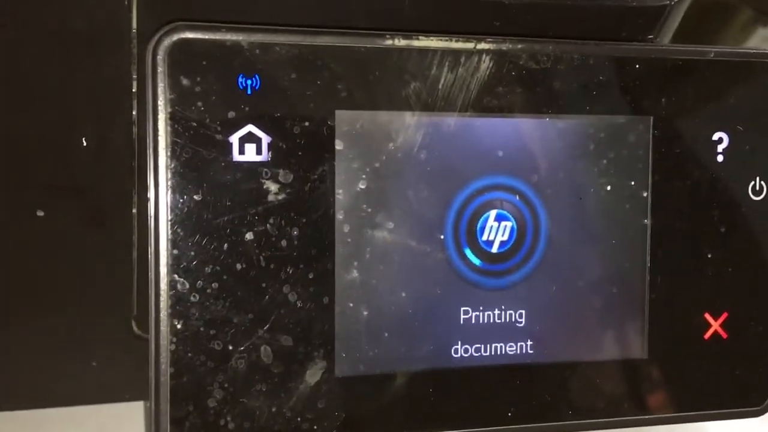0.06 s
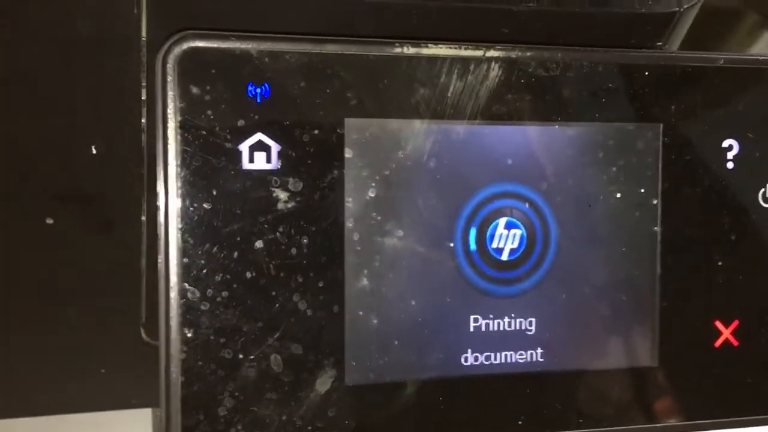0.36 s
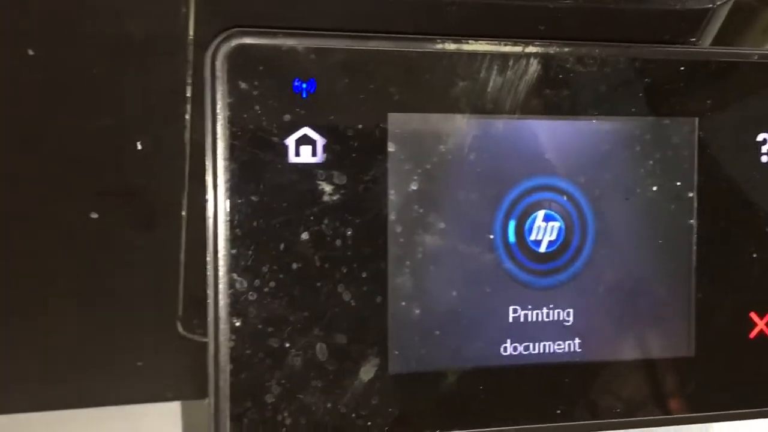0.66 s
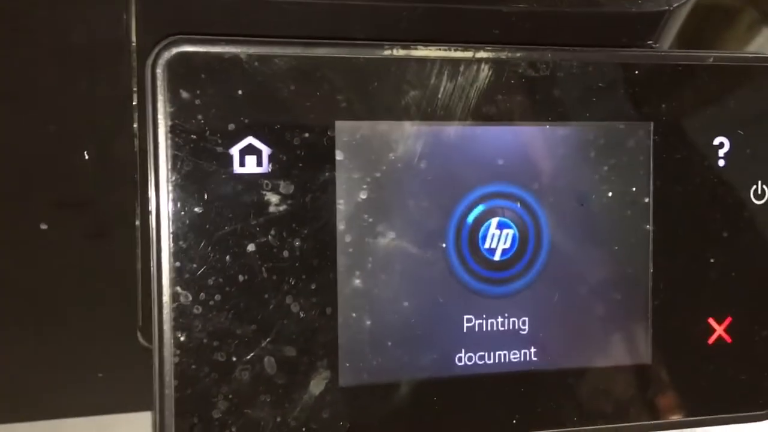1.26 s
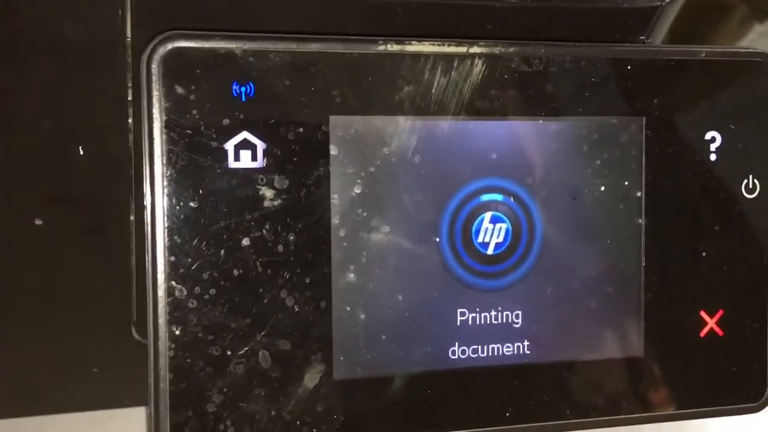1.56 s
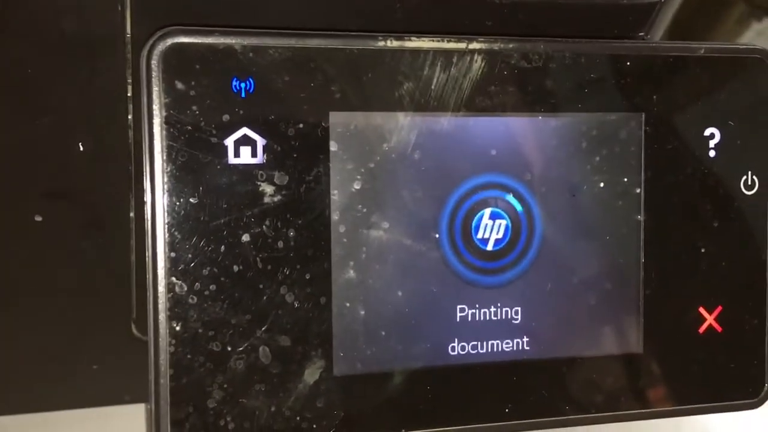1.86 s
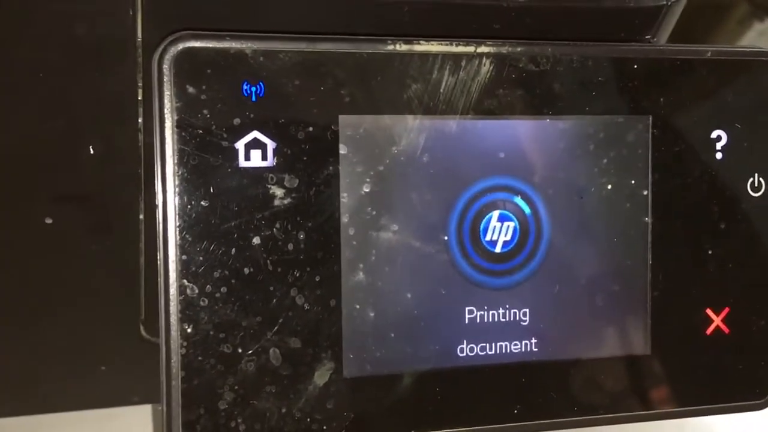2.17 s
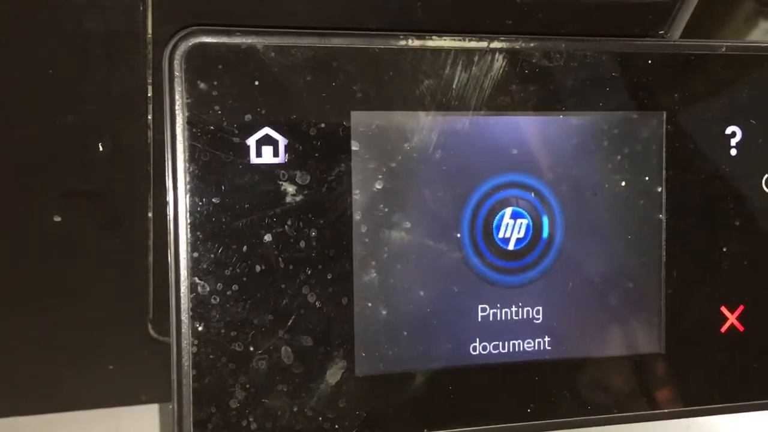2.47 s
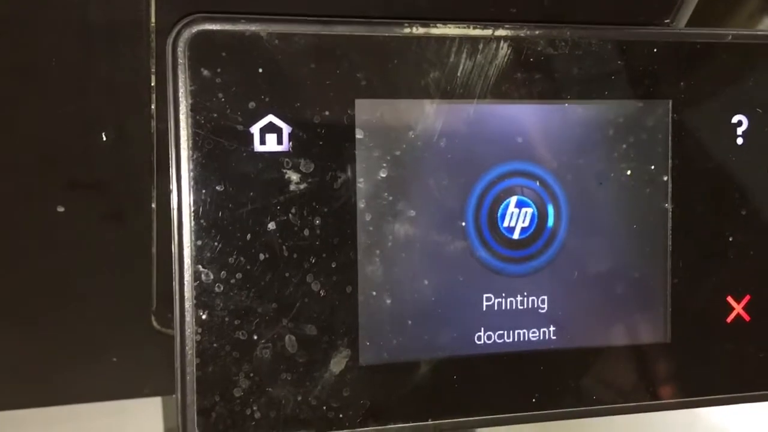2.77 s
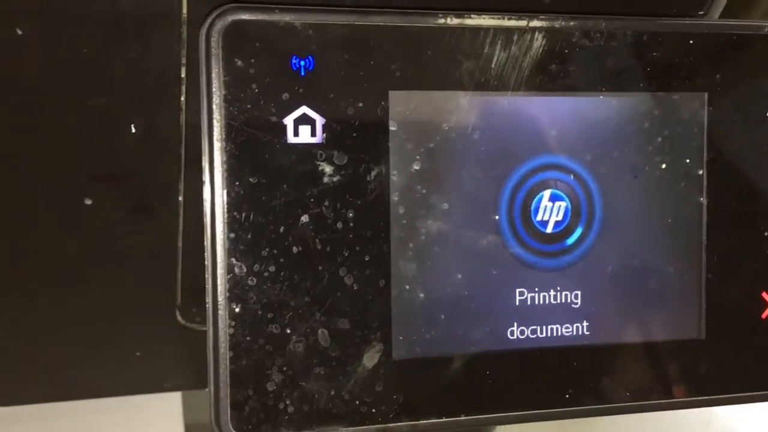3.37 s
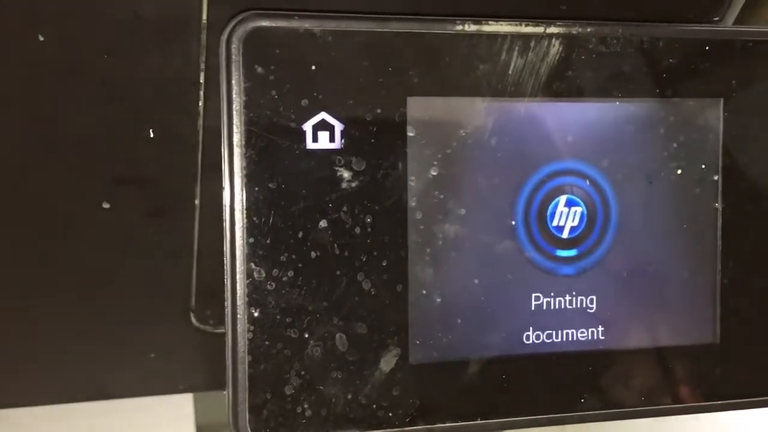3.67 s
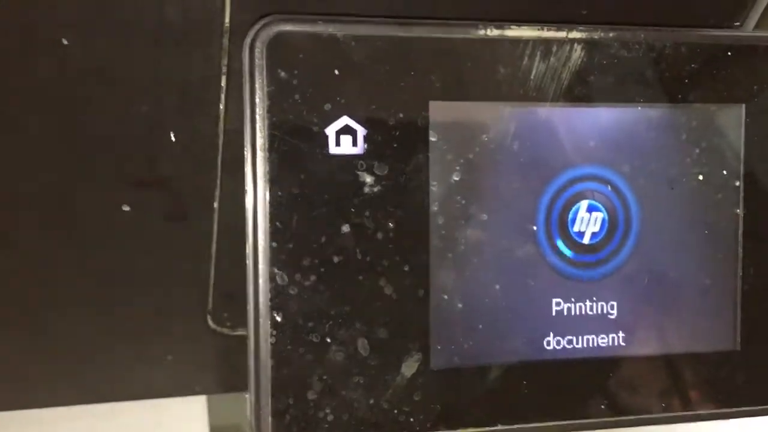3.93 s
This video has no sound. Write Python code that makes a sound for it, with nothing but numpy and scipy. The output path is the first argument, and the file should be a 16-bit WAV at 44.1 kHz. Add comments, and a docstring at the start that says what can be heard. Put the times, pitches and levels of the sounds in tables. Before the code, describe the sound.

A printer hums and whines thinly, close by in a small room. It starts with soft knocks and sliding paper, breaks into a cluster of sharp mechanical clicks midway, then settles back to steady whirring.

```python
"""A small room with an office printer at work, heard from close by, in mono.
A fan rushes, motors whine and gears hum at whole multiples of one shaft's turning speed.
The feed rollers rumble in two short runs and a sheet of paper hisses through. Plastic levers and a flap
clack, a latch and a spring ring, and the cover and paper tray knock; these blows echo briefly."""
import sys
import numpy as np
from scipy import signal
from scipy.fft import rfft, irfft, next_fast_len
from scipy.io import wavfile
from scipy.ndimage import map_coordinates

SR = 44100
rng = np.random.default_rng(int(sys.argv[2]) if len(sys.argv) > 2 else 0)


def pcm_store(signal):
    """Save signal as 16-bit PCM."""
    levels = np.round(np.clip(np.atleast_2d(signal), -1, 1) * 32767)
    wavfile.write(sys.argv[1], SR, levels.astype(np.int16).T)


N = 176400  # samples: 4 seconds


def amp(db):
    """Turn decibels into a number to multiply a sound by."""
    return 10 ** (np.asarray(db) / 20)


def unit(x):
    """Scale a sound to an average (rms) level of 1."""
    return x / np.sqrt(np.mean(x ** 2) + 1e-20)


def clock():
    """The time of each sample, in seconds."""
    return np.arange(N) / SR


def level(rows):
    """A volume curve through (time_s, level_db) points."""
    return amp(np.interp(clock(), *np.transpose(rows)))


def wobble(rate):
    """A smooth curve through `rate` random points a second."""
    points = rng.standard_normal(int(N * rate / SR) + 4)
    steps = np.arange(10 * len(points)) / 10
    return np.interp(clock() * rate, steps, map_coordinates(points, [steps]))


def filtered(x, response):
    """Turn each frequency of x up or down by response(hz)."""
    size = next_fast_len(N + SR // 2)
    return irfft(rfft(x, size) * response(np.fft.rfftfreq(size, 1 / SR)), size)[..., :N]


def housing(hz):
    """The hollow housing lifts one band of pitches slightly and weakens two high ones."""
    # humps and dips: centre_hz, width_hz, added_db
    bands = [(645, 130, 0.5), (7640, 430, -5), (10420, 490, -5.5)]
    return amp(sum(db * np.exp(-((hz - centre) / width) ** 2) for centre, width, db in bands))


def noise(colour):
    """Noise of level 1, shaped by the housing and a colour: how strong it is at each pitch."""
    pitches, db = np.transpose(colour)
    shape = lambda hz: housing(hz) * amp(np.interp(np.log(hz + 1), np.log(pitches), db))
    return unit(filtered(rng.standard_normal(N), shape))


def grainy_noise(colour, rough_db=.5):
    """Noise whose level trembles slightly and very fast."""
    return unit(noise(colour) * amp(rough_db * wobble(350)))


def tone(turns, flutter_db):
    """A pure tone with an unsteady level; `turns` counts its cycles."""
    return unit(np.sin(2 * np.pi * (turns + rng.random())) * amp(flutter_db * wobble(12)))


def add(track, start_s, sound):
    """Mix a sound into the track at start_s."""
    part = track[round(start_s * SR):][:len(sound)]
    part += sound[:len(part)]


def ringing(hits, modes, rise_s=.0008):
    """A loose part rings roughly at each hit; each mode (a pitch of its own) drops 60 dB in fade_s."""
    out, t = np.zeros(N), np.arange(SR // 5) / SR
    for start_s, db in hits:
        for hz, mode_db, fade_s in modes:
            scatter_db = rng.standard_normal()
            envelope = amp(db + mode_db + scatter_db - 60 * t / fade_s) * (1 - np.exp(-t / rise_s))
            # the wave wanders at random, which blurs its pitch
            blur = .07 * np.sqrt(hz / SR) * np.cumsum(rng.standard_normal(len(t)))
            add(out, start_s, envelope * np.sin(2 * np.pi * (hz * t + blur + rng.random())))
    return out


def room(x, level_db=-11, fade_s=.17, dull_hz=2950):
    """The small room answers with a short, dull echo."""
    t = np.arange(SR // 2) / SR
    tail = signal.sosfilt(signal.butter(1, dull_hz, fs=SR, output="sos"), rng.standard_normal(len(t)))
    tail = tail * amp(-60 * t / fade_s) * (1 - np.exp(-t / .0026))
    return amp(level_db) * signal.fftconvolve(x, tail / np.linalg.norm(tail))[:N]


def fan(level_db=-43.5, flutter_db=1.5):
    """Air rushes through the housing."""
    # colour of the air: pitch_hz, relative_db
    colour = [(15, -39), (25, -7), (110, 3.5), (413, -11.5), (602, -8.5), (652, -5.5), (870, -10),
              (1030, -8), (1120, -10), (1280, -9.5), (1820, -11), (1970, -4), (2140, -12.5), (2380, -13),
              (2650, -18.5), (3030, -18), (4930, -25.5), (5950, -24), (7580, -27.5), (8680, -26.5),
              (11700, -31), (15700, -40.5)]
    return amp(level_db + flutter_db * wobble(25.16)) * noise(colour)


def motors(drift=.00015):
    """Motors hum and whine thinly at nearly constant speed."""
    # steady tones of the motors and the fan: pitch_hz, level_db
    tones = [(157, -61), (205, -58.5), (492, -63), (602.3, -58), (2267, -62), (2409, -49), (2953, -64),
             (3171, -72), (6627, -74)]
    run_s = np.cumsum(1 + drift * wobble(7.12)) / SR
    return sum(amp(db) * tone(hz * run_s, flutter_db=.4) for hz, db in tones)


def gears(shaft_hz=32.385, drift=.0003):
    """All the gear tones follow one shaft, so they dip together when a load slows it."""
    # gear tones: cycles_per_shaft_turn, level_db
    tones = [(17, -66), (18, -65), (19, -63), (22, -59), (24, -64), (25, -66), (28, -53), (29, -61),
             (30, -58), (31, -62), (32, -66), (33, -59), (34, -56), (35, -59), (37, -60), (42, -61),
             (43, -66), (44, -63), (50, -65)]
    # loads on the shaft: middle_s, half_length_s, share_of_speed_lost
    loads = [(1.895, 0.0489, 0.0105), (2.39, 0.04, 0.01413)]
    sag = sum(lost * np.exp(-((clock() - s) / half) ** 2) for s, half, lost in loads)
    turns = np.cumsum(shaft_hz * (1 + drift * wobble(14) - sag)) / SR
    return sum(amp(db) * tone(cycles * turns, flutter_db=.7) for cycles, db in tones)


def rollers(rough_db=3.5):
    """The feed rollers rumble roughly as they run; the frame shudders at the start."""
    # rumble of the rollers: time_s, level_db
    rumble_levels = [(0, -41), (.09, -44), (.19, -46.5), (.26, -72), (.6, -73), (1.8, -51), (1.91, -40.5),
                     (1.95, -47.5), (2.2, -60), (2.3, -42), (2.42, -38), (2.65, -43), (2.71, -45),
                     (2.76, -43), (2.88, -40), (2.95, -59), (4, -73.5)]
    # its colour: pitch_hz, relative_db
    rumble_colour = [(40, -27), (70, 3.5), (180, -7), (265, 4.5), (380, -8.5), (700, -5), (1500, -8),
                     (3000, -18), (6000, -26), (10000, -31), (15000, -38)]
    # low shudder of the frame: time_s, level_db
    shudder_levels = [(0, -42), (.3, -43), (.58, -49), (.7, -57)]
    # its colour: pitch_hz, relative_db
    shudder_colour = [(25, -25), (43, -2), (52, -6), (63, 9.5), (76, -4.5), (112, 2), (135, -7.5),
                      (210, -0.5), (320, -26), (900, -37)]
    rumble = unit(noise(rumble_colour) * amp(rough_db * wobble(110)))
    return level(rumble_levels) * rumble + level(shudder_levels) * noise(shudder_colour)


def clatter_tail(level_db=-35, fade_s=.36):
    """The tail of a clatter dies away at the start."""
    # colour of the tail: pitch_hz, relative_db
    colour = [(300, -1), (650, -11), (1000, 4.5), (1700, -10), (2600, -17), (6000, -21), (9000, -20),
              (15500, -30)]
    return amp(level_db - 60 * clock() / fade_s) * grainy_noise(colour)


def sheet():
    """The sheet hisses as it slides along."""
    # hiss of sliding: time_s, level_db
    levels = [(0, -52.5), (.155, -49), (.18, -58.5), (.5, -55.5), (.58, -51), (.95, -53), (1.3, -55.5),
              (1.6, -54), (1.8, -57), (2.9, -62.5)]
    # its colour: pitch_hz, relative_db
    colour = [(800, -55), (2500, -5.5), (3600, 3), (4800, 0), (6500, -5.5), (9000, -9), (15000, -21)]
    return level(levels) * grainy_noise(colour)


def brushing(flicks_per_s=85, flick_fade_s=.008, flick_over_rub_db=5):
    """The paper brushes the guides in short strokes full of tiny flicks."""
    # strokes: middle_s, half_length_s, level_db
    strokes = [(0.073, .012, -48.5), (0.138, 0.014, -55), (0.443, .025, -50.5), (1.423, 0.015, -48),
               (1.978, 0.0042, -43), (2.292, 0.02, -46.5), (2.84, 0.034, -56), (3.216, 0.025, -53),
               (3.307, 0.027, -49), (3.754, 0.031, -48.5)]
    # colour of the rubbing: pitch_hz, relative_db
    colour = [(600, -17), (2000, 4.5), (3000, 3), (5000, -8), (7500, -7.5), (9300, -4.5), (12800, -14),
              (15500, -22)]
    swells = sum(amp(db) * np.exp(-((clock() - s) / half) ** 2 / 2) for s, half, db in strokes)
    since_flick_s = (flicks_per_s * clock() + .3 * wobble(50)) % 1 / flicks_per_s
    flicks = amp(flick_over_rub_db) * unit(amp(-60 * since_flick_s / flick_fade_s))
    return swells * unit(grainy_noise(colour) * (1 + flicks))


def tray():
    """The paper tray gives hollow knocks while the rollers run."""
    # knocks: start_s, level_db
    hits = [(.072, -32.5), (.176, -29), (2.296, -35), (2.363, -27.5), (2.615, -35), (2.643, -33.5),
            (2.842, -32.5)]
    # ringing: pitch_hz, relative_db, fade_s
    modes = [(205, -10, 0.06), (258, 2, 0.075)]
    return ringing(hits, modes, rise_s=.004)


def cover():
    """The cover answers the heavier blows with a dull knock."""
    # knocks: start_s, level_db
    hits = [(1.342, -34), (1.896, -32), (1.91, -34), (2.097, -34), (2.365, -35)]
    # ringing: pitch_hz, relative_db, fade_s
    modes = [(620, -4, .05), (745, 0, .05)]
    return ringing(hits, modes)


def flap():
    """A stiff plastic flap clacks."""
    # clacks: start_s, level_db
    hits = [(1.8615, -31), (1.868, -28), (2.405, -28)]
    # ringing: pitch_hz, relative_db, fade_s
    modes = [(1730, -1.5, 0.034), (2100, 0, .02)]
    return ringing(hits, modes)


def spring():
    """A spring, struck twice in quick succession, rings high and thin."""
    # strikes: start_s, level_db
    hits = [(1.6575, -23), (1.667, -22.5)]
    # ringing: pitch_hz, relative_db, fade_s
    modes = [(3546, -13, 0.079), (6340, -4.5, 0.041), (6730, -6, 0.032), (7700, -8, 0.043),
             (7500, -3, 0.024), (11200, -13, 0.045), (13000, -11, .028)]
    return ringing(hits, modes)


def latch():
    """A latch rings briefly at each contact."""
    # contacts: start_s, level_db
    hits = [(1.3325, -25), (1.3398, -21), (2.081, -30.5)]
    # ringing: pitch_hz, relative_db, fade_s
    modes = [(1275, 2.5, 0.033), (1410, -4, 0.022), (1826, -7, 0.028), (2680, -8, 0.022), (3380, -1, 0.018)]
    return ringing(hits, modes)


def levers(rise_s=.0016):
    """Plastic levers strike and shake at so many pitches at once that each click is a burst of noise."""
    # clicks: start_s, thud_db, clack_db, snap_db, tick_db, crisp_edge_db
    clicks = [(1.3314, -39, -31, -24, -33, -43), (1.3396, -32, -34, -37, -47, -46),
              (1.48, -61, -38.5, -43, -45, -52), (1.658, -36.5, -37, -38, -31, -44),
              (1.6677, -40, -42, -31, -34, -41), (1.8595, -35, -33, -29.5, -36, -41),
              (1.895, -35.5, -33, -38, -42, -44), (1.906, -35.5, -34, -35.5, -42, -50),
              (2.0772, -37.5, -36, -31.5, -34.5, -37.5), (2.357, -31, -41, -44, -36, -36.5),
              (2.3709, -45, -30.5, -27.5, -44, -42), (2.3948, -43, -33, -30, -24.5, -31),
              (2.403, -39, -24.5, -23, -32, -32), (2.417, -56, -42, -43, -31, -38),
              (2.48, -55, -35, -30, -27, -40), (2.5158, -61, -36, -38, -29.5, -43),
              (2.525, -47, -48, -34.5, -36, -43), (2.7426, -34.5, -32.5, -38, -45, -47),
              (2.751, -33, -44, -33, -46, -57), (2.764, -62, -42, -36.5, -44, -57),
              (2.8043, -42, -51, -37.5, -47, -58)]
    # those five bands, from thud to crisp edge: low_hz, high_hz, fade_s
    bands = [(375, 900, 0.062), (1010, 2600, 0.049), (2340, 4660, 0.04), (4900, 8620, 0.051),
             (8850, 13300, 0.05)]
    out, t = np.zeros(N), np.arange(SR // 5) / SR
    for start_s, *levels in clicks:
        for db, (low_hz, high_hz, fade_s) in zip(levels, bands):
            band = signal.butter(3, [low_hz, high_hz], btype="band", fs=SR, output="sos")
            shake = unit(signal.sosfilt(band, rng.standard_normal(len(t))))
            envelope = amp(db - 60 * t / fade_s) * (1 - np.exp(-t / rise_s))
            add(out, start_s, shake * envelope)
    return filtered(out, housing)


def scene():
    """The printer sits straight ahead, the same in both ears; only the blows echo."""
    blows = levers() + latch() + spring() + flap() + cover() + tray()
    running = gears() + motors() + fan() + rollers() + clatter_tail() + sheet() + brushing()
    printer = running + blows + room(blows)
    return np.array([printer, printer])


def record(dry, low_hz=25, top_hz=15900):
    """Cut away the deepest bass and the highest treble."""
    return filtered(dry, lambda hz: (hz > low_hz) * (hz < top_hz))


dry = scene()
out = record(dry)
pcm_store(out)
```